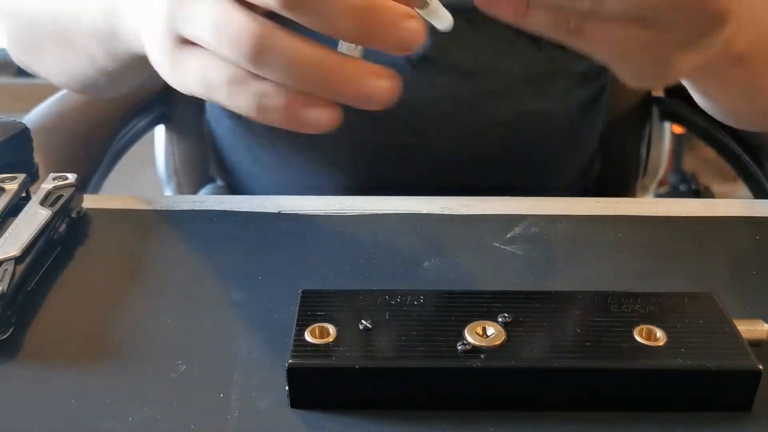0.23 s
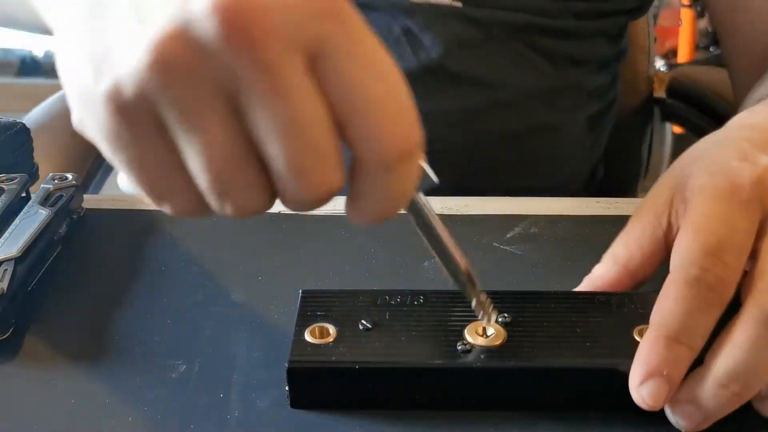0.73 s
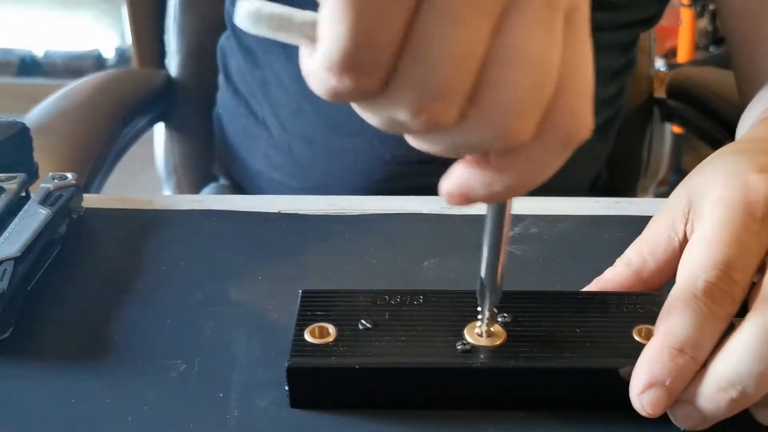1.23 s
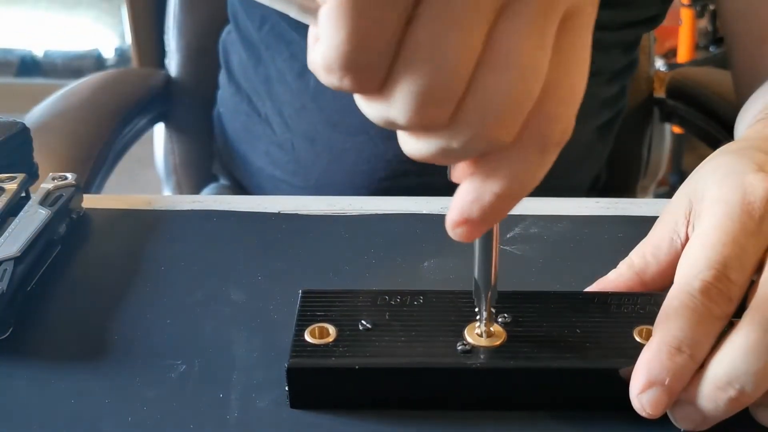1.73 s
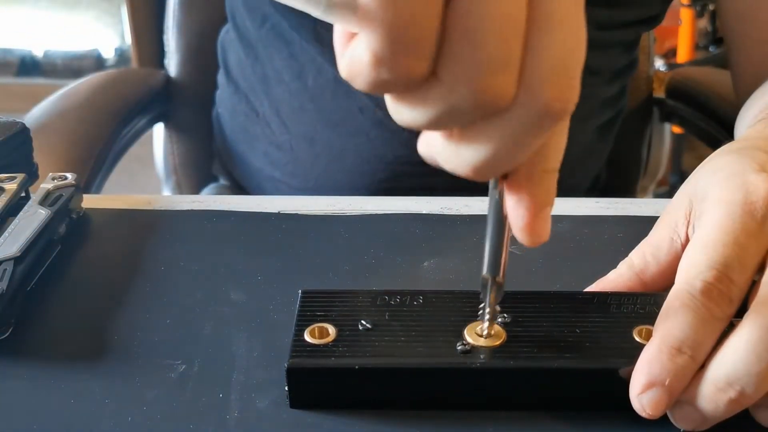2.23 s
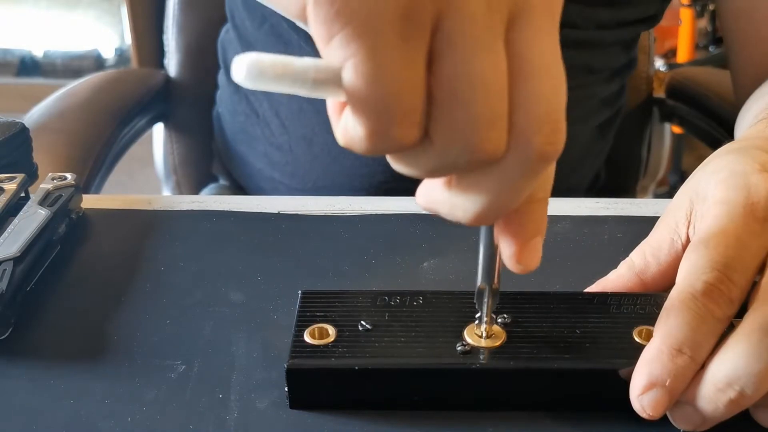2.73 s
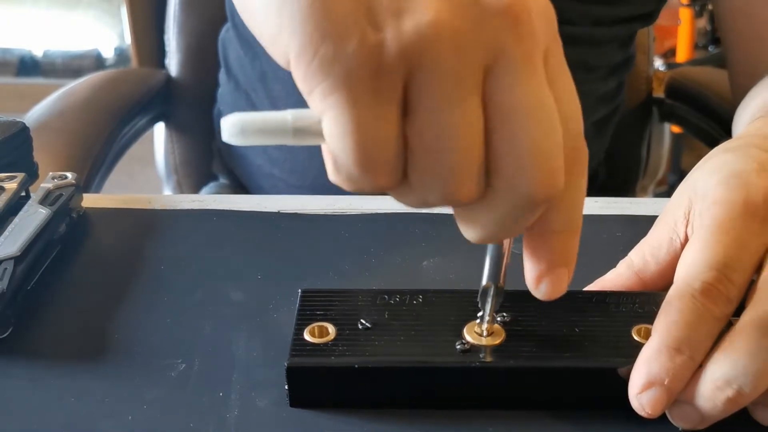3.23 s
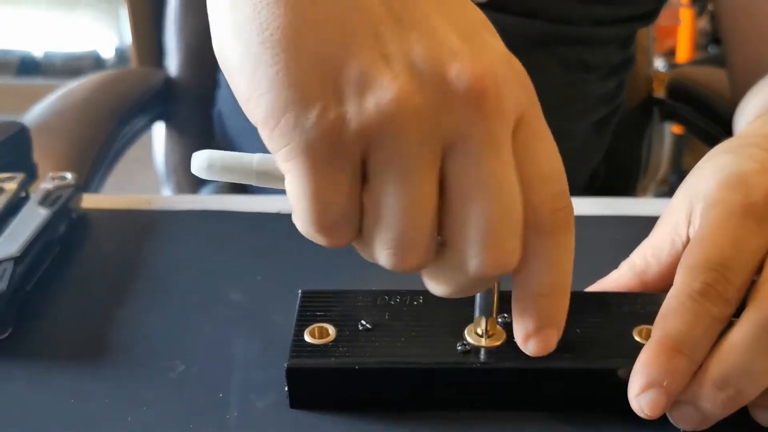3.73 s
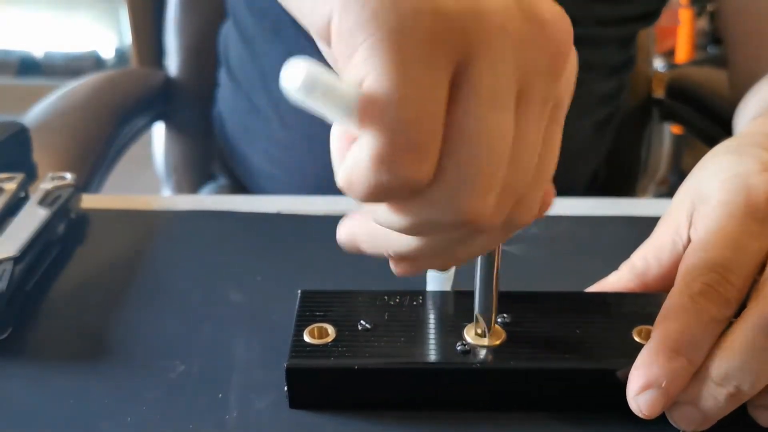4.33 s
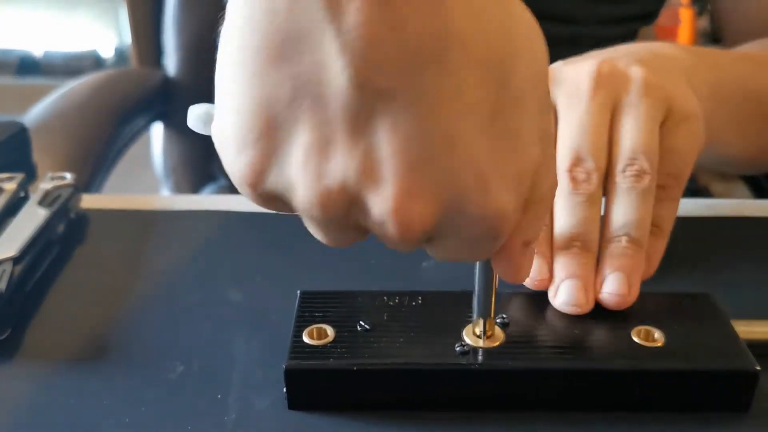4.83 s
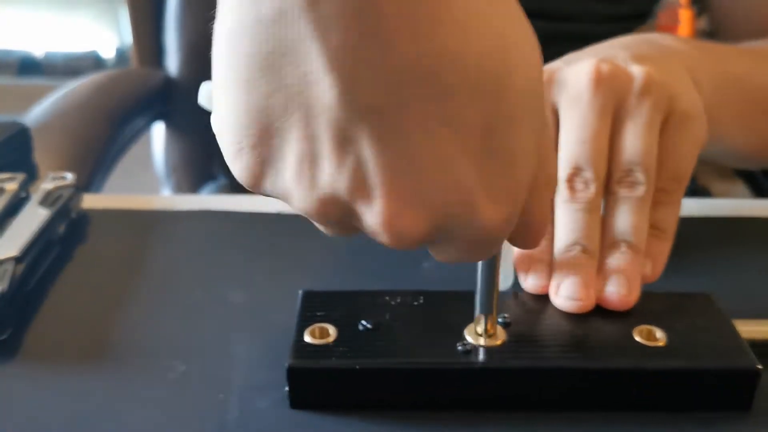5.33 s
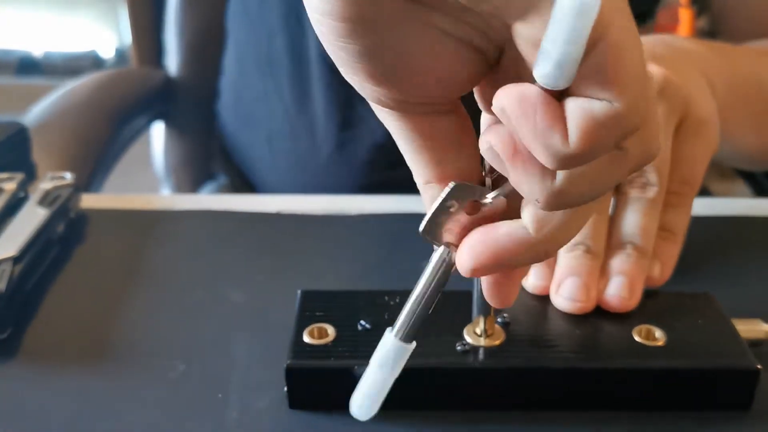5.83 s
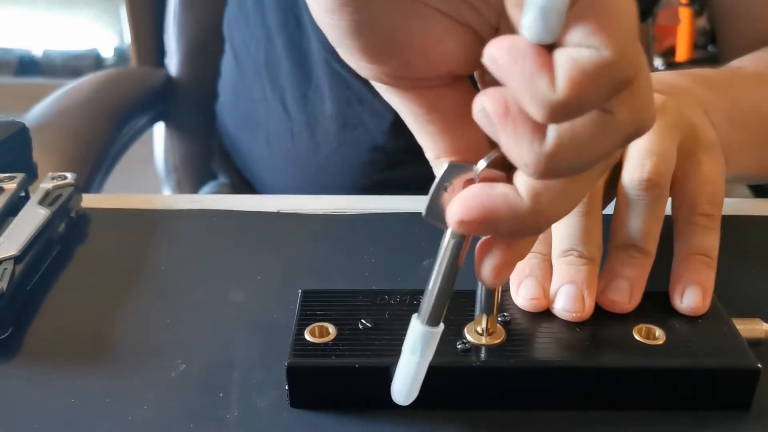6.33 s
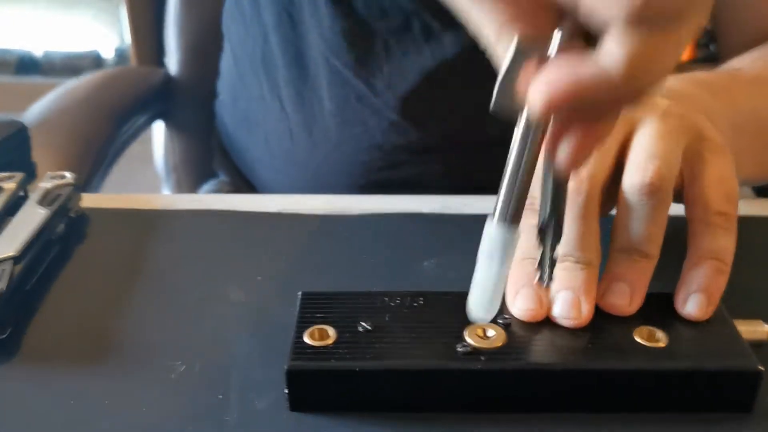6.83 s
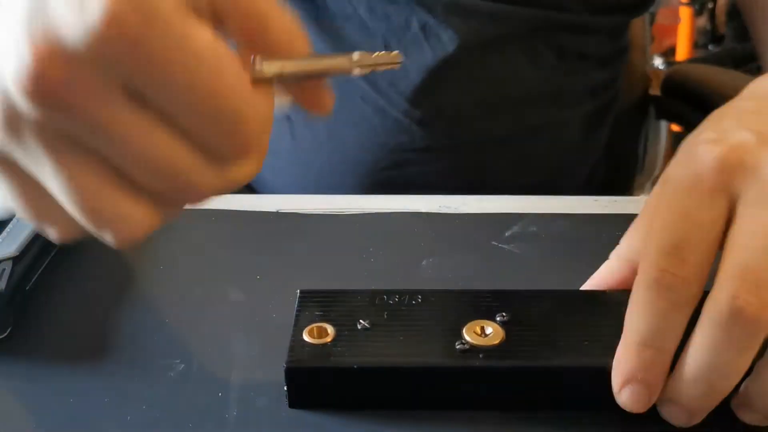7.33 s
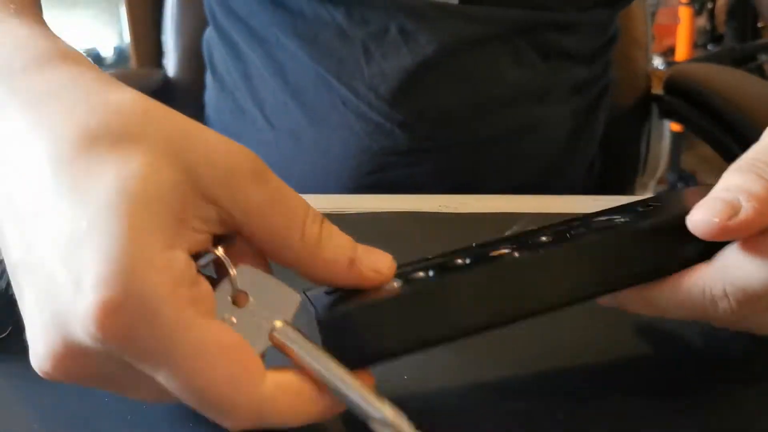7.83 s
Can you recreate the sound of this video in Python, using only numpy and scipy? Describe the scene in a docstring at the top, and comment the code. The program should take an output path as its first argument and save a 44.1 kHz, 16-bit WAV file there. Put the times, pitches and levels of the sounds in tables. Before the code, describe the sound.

Keys jangle, then one is fitted and turned in a steel bolt lock on a desk, with sharp clicks, scrapes and knocks.

```python
"""Keys jangle on their ring, close to a stereo microphone at a desk in a small, quiet room. One key is
fitted into a steel bolt lock lying on the desk, jiggled, pushed home, turned and pulled out; then the lock
is lifted and the keys tap it. Each contact in the lock clicks in the keys, knocks the hollow case and thumps
the desk top. Between the clicks metal scrapes on metal and hands jolt the desk, over faint room tone."""
import sys
import numpy as np
from scipy import signal
from scipy.fft import rfft, irfft, next_fast_len
from scipy.io import wavfile
from scipy.ndimage import uniform_filter1d

SR = 44100
rng = np.random.default_rng(int(sys.argv[2]) if len(sys.argv) > 2 else 0)


def unload_wav(signal):
    """Save mono or channel-first audio to the path in sys.argv[1] as 16-bit WAV at rate SR, clipped to [-1, 1]."""
    wavfile.write(
        sys.argv[1],
        SR,
        np.round(np.clip(np.atleast_2d(signal).T, -1, 1) * 32767).astype(np.int16),
    )


N = 355931

# room tone spectrum: (frequency [Hz], relative level [dB])
HUSH_SPECTRUM = [(12, -28.5), (20, 3), (171, -15.5), (318, -17), (472, -22), (559, -19), (1300, -25.5),
                 (2290, -24.5), (2870, -31.5), (15200, -35), (17000, -55.5)]
# room tone, a little louder at first: (time [s], level above 3.5 kHz [dB])
HUSH_LEVEL = [(0.0, -78.5), (0.212, -84.5), (1.2, -83)]
# room tone across the microphone: (frequency [Hz], left-right likeness [0-1])
HUSH_LIKENESS = [(60, 1), (380, 1), (2380, 0), (15000, 0)]
# decay of the room: (frequency [Hz], t60 [s])
ROOM_DECAY = [(200, 0.32), (1500, 0.27), (6000, 0.26), (14000, 0.12)]

# modes of the desk top, its legs, the lock case, its free side plate and the keys:
# (frequency [Hz], relative level [dB], nominal t60 [s])
DESK_MODES = [(99.4, -10, 0.37), (147.6, -1, 0.13), (187.5, -0.5, 0.13), (271.7, -3.5, 0.1),
              (304.8, -4, 0.12), (424, -17, 0.085)]
LEG_MODES = [(37, -8, 0.14), (54, -2.5, 0.46)]
CASE_MODES = [(480, -3.5, 0.048), (650, -3.5, 0.013), (803.6, 5, 0.05), (1141, -8, 0.058),
              (1300, -6.5, 0.24), (1864, -2, 0.044), (2249, 0.5, 0.033), (2930, -6, 0.032)]
PLATE_MODES = [(4100, -12, .1), (5575, -8, .17), (7512, 0, .17), (7535, -4, .17), (9620, -7, .12),
               (10550, -6, .1), (13500, -8, .1)]
KEY_MODES = [(3150, -4, .025), (4800, -7, .025), (6050, 0, .04), (7600, -9, .04), (9100, -4, .035),
             (9900, -3, .035), (10900, -4, .035), (12100, 0, .04), (12900, -2, .045), (15500, -15, .05)]

# a hand jolts the desk: (time [s], level [dB])
HAND_JOLTS = [(3.238, -44), (6.593, -35.5), (6.897, -21.5), (7.369, -36.5), (7.726, -50.5)]
# the desk rocks on its legs: (time [s], level [dB])
DESK_SWAYS = [(0.929, -58), (3.557, -36), (4.949, -53), (6.84, -35.5), (7.369, -54), (7.747, -62.5)]
# hands press on the desk: (time [s], level [dB])
HAND_PRESSURE = [(.7, -73), (.95, -67.5), (3.4, -67.5), (3.8, -60.5), (5.2, -64), (5.8, -88.5), (6.3, -76),
                 (7, -70), (7.6, -84)]
# rubbing strokes: (time [s], length [s], key level [dB], case level [dB], desk level [dB])
RUB_STROKES = [(0.969, 0.057, -69, -54.5, -52.5), (1.983, 0.066, -69, -54.5, -57.5),
               (2.324, 0.11, -88, -57.5, -64), (3.533, 0.1, -40, -43.5, -32.5),
               (3.641, 0.052, -49.5, -45, -34), (3.876, 0.22, -52.5, -59.5, -54.5),
               (4.009, 0.099, -57.5, -57, -56.5), (4.379, 0.28, -52.5, -45.5, -54),
               (4.531, 0.038, -36, -40, -52.5), (4.695, 0.18, -68.5, -68.5, -56),
               (4.853, 0.25, -65.5, -58.5, -67.5), (5.353, 0.68, -65, -56, -49.5),
               (5.558, 0.058, -48.5, -36.5, -49.5), (5.646, 0.057, -43.5, -43, -45.5),
               (5.782, 0.061, -38.5, -34, -46.5), (6.849, 0.11, -46.5, -44.5, -33),
               (7.192, 0.13, -60.5, -67.5, -68.5), (7.464, 0.17, -52.5, -74.5, -76),
               (8.034, 0.56, -46, -73, -99)]
# spectrum of a scraping key: (frequency [Hz], relative level [dB])
RASP_SPECTRUM = [(1470, -31.5), (2500, 0.5), (3360, 6), (4760, 10), (6010, -1), (8870, 3.5), (16000, 5)]
# keys hit keys, ring or pins: (time [s], level [dB], band centre [Hz])
KEY_JINGLES = [(0.067, -30.5, 11900), (0.074, -31.5, 6700), (0.135, -25, 9600), (0.138, -25, 9200),
               (0.1416, -31.5, 10300), (.151, -19, 9600), (.1584, -32, 13400), (0.1677, -33.5, 10400),
               (0.184, -18, 11300), (0.1973, -16.5, 11400), (0.2286, -33.5, 9700), (0.2805, -33.5, 8300),
               (0.398, -20.5, 11300), (0.401, -29.5, 5960), (0.4757, -42.5, 9000), (0.493, -47.5, 12800),
               (0.5252, -39, 6200), (.617, -30.5, 8800), (1.4452, -38, 6050), (2.5752, -39, 11400),
               (3.5684, -18.5, 10300), (3.582, -32.5, 10900), (3.852, -48.5, 8900), (3.888, -41, 6000),
               (3.896, -52, 8000), (3.9174, -31.5, 5700), (3.93, -32, 9100), (3.941, -30.5, 5600),
               (3.961, -39, 6500), (4.0165, -22.5, 7100), (4.125, -26.5, 10000), (4.299, -43.5, 5050),
               (4.351, -32, 6700), (4.357, -35.5, 6550), (4.414, -36.5, 12000), (4.44, -30.5, 9500),
               (4.6279, -37.5, 10100), (4.9502, -38.5, 6770), (5.012, -35.5, 11600), (5.471, -40.5, 8700),
               (5.503, -47, 8000), (5.53, -41, 6100), (5.7788, -31.5, 8800), (5.796, -38.5, 10000),
               (6.852, -35, 11000), (6.879, -31.5, 10200), (6.913, -27, 10500), (7.195, -29.5, 7700),
               (7.224, -36, 8100), (7.289, -43, 8900), (7.3446, -34.5, 7800), (7.4745, -27, 7600),
               (7.479, -40, 8700), (7.573, -32.5, 5700), (7.591, -44.5, 5000)]
# the key strikes inside the lock:
# (time [s], key level [dB], key centre [Hz], case level [dB], case centre [Hz], desk level [dB])
LOCK_CONTACTS = [(0.904, -31, 4330, -27, 910, -41), (1.129, -77, 4020, -31.5, 710, -50.5),
                 (1.253, -78, 3970, -53, 780, -51.5), (1.391, -39, 6600, -25, 1840, -52.5),
                 (1.506, -32.5, 6460, -34, 1570, -46.5), (1.560, -73, 5000, -44.5, 824, -40),
                 (1.708, -48.5, 6560, -50.5, 2100, -78), (1.831, -58.5, 5050, -40, 2200, -62),
                 (2.011, -40, 10300, -39.5, 2250, -68), (2.091, -37.5, 3800, -30.5, 875, -50),
                 (2.276, -81, 4000, -41, 820, -74), (2.350, -26, 11000, -22.5, 1730, -43.5),
                 (2.388, -42, 10300, -30, 865, -40), (2.494, -62, 5200, -44.5, 825, -60),
                 (2.554, -44, 8700, -33, 920, -46), (2.666, -50, 9800, -49.5, 810, -57),
                 (2.713, -54, 6000, -36, 970, -39.5), (2.992, -66, 4000, -53, 776, -37.5),
                 (3.118, -76, 4100, -46, 733, -35), (3.184, -52, 9700, -42, 2600, -70),
                 (3.539, -29, 11200, -18.5, 764, -25.5), (3.553, -38, 13200, -25.5, 2200, -46.5),
                 (3.658, -19, 4270, -16, 1690, -31), (3.996, -38, 10700, -25, 660, -35),
                 (4.156, -33.5, 6750, -24.5, 1870, -48), (4.286, -35.5, 6130, -32, 2030, -52.5),
                 (4.413, -41, 6100, -44, 2120, -44), (4.429, -33, 9300, -24, 1755, -44),
                 (4.450, -33, 6540, -23.5, 840, -44), (4.474, -38, 7000, -25.5, 2130, -36),
                 (4.519, -35, 12780, -21.5, 841, -42), (4.5359, -22, 5090, -15.5, 2040, -32),
                 (4.546, -38, 5000, -24, 2110, -51.5), (4.722, -42, 5830, -32.5, 584, -35.5),
                 (4.769, -71, 5000, -37.5, 585, -63), (4.834, -72, 5000, -44, 800, -71),
                 (4.871, -52, 9500, -44, 1900, -72), (4.914, -48, 6800, -35.5, 720, -50),
                 (4.93, -50, 6000, -39.5, 2090, -51), (5.104, -77, 5040, -48.5, 763, -54),
                 (5.286, -74, 5000, -39.5, 2180, -46.5), (5.351, -78, 5000, -50.5, 510, -42.5),
                 (5.409, -43, 11000, -47, 911, -40), (5.456, -45, 6560, -34, 798, -45.5),
                 (5.548, -41.5, 4750, -31, 754, -65), (5.566, -48, 5000, -26.5, 800, -74.5),
                 (5.577, -12, 9700, -15, 2130, -35), (5.652, -30, 11900, -31.5, 757, -64.5),
                 (5.67, -20.5, 12200, -24.5, 790, -47), (5.8015, -8.5, 11300, -26.5, 934, -41),
                 (5.944, -44, 6100, -31, 570, -43.5), (6.024, -46.5, 8200, -43, 1090, -47.5),
                 (6.080, -54, 4930, -53, 1011, -54), (6.129, -63, 9050, -52.5, 890, -61),
                 (6.157, -63, 5800, -48, 605, -47.5), (6.489, -69, 4000, -50, 1910, -44),
                 (6.501, -54.5, 3950, -38, 1190, -35.5), (6.617, -62.5, 4040, -40.5, 890, -36),
                 (6.805, -63, 3820, -31.5, 1390, -38.5), (6.831, -32.5, 10500, -26, 2100, -19.5)]
# keys tap the lifted case:
# (time [s], key level [dB], key centre [Hz], case level [dB], case centre [Hz], plate level [dB])
CASE_TAPS = [(7.645, -15.5, 11300, -13.5, 1730, -31), (7.701, -32.5, 6860, -30.5, 1300, -26.5),
             (7.907, -22, 8900, -17, 1440, -43), (8.007, -66, 6000, -37, 1690, -71),
             (8.026, -31.5, 8700, -26, 1250, -49)]
# the keys are gripped and damped: (start [s], end [s])
GRIPPED = (.85, 7.0)

LIFT_S = 7.6  # the case leaves the desk
PAN_DB, PAN_DB_PER_OCTAVE, PAN_SCATTER_DB = -3.5, -1.5, 4  # left minus right at 6 kHz; bright leans right
GRAZE_LEAD_S, GRAZE_DB, REBOUND_LAG_S, REBOUND_DB = .0025, -23, .008, -14  # typical, relative to the blow


def amp(db):
    """Decibels to amplitude."""
    return 10 ** (np.asarray(db) / 20)


def unit(x):
    """Scale to an RMS of one."""
    return x / np.sqrt(np.mean(x ** 2) + 1e-20)


def along(points, hz):
    """Interpolate (frequency, value) points on a log axis."""
    f, v = np.transpose(points)
    return np.interp(np.log(hz + 1), np.log(f + 1), v)


def level_curve(points):
    """One amplitude per sample from (time [s], level [dB]) points."""
    return amp(np.interp(np.arange(N) / SR, *np.transpose(points)))


def add(track, s, sound):
    """Lay a sound on the track at time s."""
    part = track[:, round(s * SR):][:, :sound.shape[1]]
    part += sound[:, :part.shape[1]]


def filtered(x, response):
    """Pass x through a complex frequency response."""
    n = x.shape[-1]
    size = next_fast_len(n + 2048)
    return irfft(rfft(x, size) * response(np.fft.rfftfreq(size, 1 / SR)), size)[..., :n]


def band(centre_hz, q):
    """One broad resonance."""
    return lambda f: 1j * f * centre_hz / q / (centre_hz ** 2 - f * f + 1j * f * centre_hz / q)


def thin(low_hz):
    """Small parts radiate no bass."""
    return lambda f: (-f * f / (low_hz ** 2 - f * f + 1j * np.sqrt(2) * f * low_hz)) ** 2


def resonant(modes, broaden):
    """Response of modes of alternating sign; faster decay makes a wider peak."""
    width = lambda t60: broaden * np.log(1000) / np.pi / t60
    return lambda f: sum((-1) ** k * amp(db) * band(hz, q=hz / width(t60))(f)
                         for k, (hz, db, t60) in enumerate(modes))


def scattered(modes, spread_db, detune=.015):
    """Each blow lands elsewhere, changing the modes' strengths; grip and seat shift their pitch."""
    return [(hz * (1 + detune * rng.normal()), db + rng.normal(0, spread_db), t60)
            for hz, db, t60 in modes]


def ring(modes, centre_hz, octaves, t60_scale, attack_s, phase_spread, scatter_db):
    """One blow: modes near centre_hz ring most, each at its own phase in each channel."""
    hz, db, t60 = np.transpose(modes)[:, :, None]
    t = np.arange(SR // 3) / SR
    strength, phase = rng.standard_normal((2, len(modes), 1))
    level = db + scatter_db * strength - 6 * (np.log2(hz / centre_hz) / octaves) ** 2
    fade = amp(level - 60 * t / (t60 * t60_scale)) * (1 - np.exp(-t / attack_s))
    pair = [np.sum(fade * np.sin(2 * np.pi * hz * t + side * phase_spread * phase), 0)
            for side in (1, -1)]
    return np.array(pair) / np.abs(np.mean(pair, 0)).max()


def left_right(mid, side, alike=0):
    """Two channels from mid and side; alike=1 is mono."""
    return np.array([mid + (1 - alike) * side, mid - (1 - alike) * side])


def puff(colour, t60, rise_s, alike):
    """Filtered stereo noise that swells and dies; its mid peaks at one."""
    t = np.arange(SR // 6) / SR
    mid, side = rng.standard_normal((2, len(t))) * amp(-60 * t / t60) * (1 - np.exp(-t / rise_s)) ** 2
    pair = filtered(left_right(mid, side, alike), colour)
    return pair / np.abs(pair.mean(0)).max()


def grit(colour, slips_per_s, spread_db, alike):
    """Small slips of random size over smooth friction noise, filtered, at unit RMS."""
    slips = (rng.random(N) < slips_per_s / SR) * amp(spread_db * np.minimum(rng.exponential(size=N), 3))
    lumps = uniform_filter1d(slips, size=90)
    mid, side = rng.standard_normal((2, N)) * (1 + unit(lumps))
    return unit(filtered(left_right(mid, side, alike), colour))


def chattering(blows):
    """No contact is clean: a faint graze leads each blow and a weaker rebound follows."""
    out = []
    for s, db, hz in blows:
        lead, graze, lag, rebound = .5 + rng.random(4)
        out += [(s - GRAZE_LEAD_S * lead, db + GRAZE_DB * graze, hz), (s, db, hz),
                (s + REBOUND_LAG_S * lag, db + REBOUND_DB * rebound, hz)]
    return out


def hush():
    """Room tone and microphone noise, centred in the bass and wide in the treble."""
    angle = lambda f: np.arccos(np.clip(along(HUSH_LIKENESS, f), -1, 1)) / 2
    colour = lambda f: amp(along(HUSH_SPECTRUM, f)) * [np.cos(angle(f)), np.sin(angle(f))]
    mid, side = filtered(rng.standard_normal((2, N)), colour)
    treble = filtered(mid, lambda f: f > 3500)
    return level_curve(HUSH_LEVEL) * left_right(mid, side) / treble.std()


def room(x, delay_s=.0028):
    """Near walls answer, the treble dying first; every quarter second meets a fresh tail."""
    out, step = np.zeros_like(x), SR // 4
    for start in range(0, N, step):
        hz, t, noise = signal.stft(rng.standard_normal((2, SR // 2)), SR, nperseg=256)
        tail = signal.istft(noise * amp(-60 * t / along(ROOM_DECAY, hz)[:, None]), SR, nperseg=256)[1]
        tail /= np.linalg.norm(tail[0])
        add(out, start / SR + delay_s, signal.fftconvolve(x[:, start:start + step], tail, axes=1))
    return out


def squeak(start_s=6.62, length_s=.18, start_hz=4300, fall_hz_per_s=4400):
    """A faint, unsteady falling squeak with a second tone an octave below."""
    progress = np.clip((np.arange(N) / SR - start_s) / length_s, 0, 1)
    hz = start_hz - fall_hz_per_s * progress * length_s
    waver_hz = 900 * uniform_filter1d(rng.standard_normal(N), size=150)
    phase = 2 * np.pi * np.cumsum(hz + waver_hz) / SR
    swell = np.sin(np.pi * progress ** .39) ** 2
    return amp(-77.5) * swell * (np.sin(phase) + .98 * np.sin(phase / 2))


def desk_thumps(boom_hz=175, scatter_octaves=.15):
    """Under the microphone, a little left, the desk top booms in its low modes and rocks on its legs."""
    out = np.zeros((2, N))
    for s, *_, db in LOCK_CONTACTS + HAND_JOLTS:
        hz = boom_hz * 2 ** (scatter_octaves * rng.normal())
        boom = ring(DESK_MODES, hz, octaves=.61, t60_scale=1, attack_s=.0036,
                    phase_spread=.25, scatter_db=3)
        add(out, s, amp(db) * boom)
    for s, db in DESK_SWAYS:
        sway = ring(LEG_MODES, 50, octaves=1.5, t60_scale=.92, attack_s=.019,
                    phase_spread=.18, scatter_db=3.5)
        add(out, s, amp(db) * sway)
    return out * amp([[1.4], [-1.4]])


def rubbing():
    """Keys scrape each other and the pins; case and desk take up the strokes, and leaning hands rumble."""
    strokes = np.zeros((3, N))
    for s, length, *levels in RUB_STROKES:
        progress = np.linspace(0, 1, round(length * SR))
        add(strokes, s, amp(levels)[:, None] * np.sin(np.pi * progress ** .65))
    on_keys, on_case, on_desk = strokes
    case_colour = lambda f: resonant(CASE_MODES, broaden=2.5)(f) * band(850, q=.6)(f)
    rasp = grit(lambda f: amp(along(RASP_SPECTRUM, f)), slips_per_s=220, spread_db=4, alike=.089)
    drone = grit(case_colour, slips_per_s=120, spread_db=7.5, alike=1)
    rumble = grit(resonant(DESK_MODES, broaden=3.4), slips_per_s=60, spread_db=2.5, alike=1)
    fade_in = np.clip(np.arange(N) / SR / HAND_PRESSURE[0][0], 0, 1) ** 4
    on_desk += level_curve(HAND_PRESSURE) * fade_in
    return (on_keys * rasp * amp([[-2.5], [2.5]]) + on_case * drone
            + on_desk * rumble * amp([[1.4], [-1.4]]))


def case_knocks(lag_s=.00071):
    """The hollow steel case answers just after each click; lifted, it loses bass and its plate rings."""
    out = np.zeros((2, N))
    for s, db, hz in chattering([(s, db, hz) for s, _, _, db, hz, _ in LOCK_CONTACTS + CASE_TAPS]):
        low_cut = thin(low_hz=1000 if s > LIFT_S else 300)
        modes = resonant(scattered(CASE_MODES, spread_db=3), broaden=1.8)
        body = puff(lambda f: band(hz, q=.85)(f) ** 2 * modes(f) * low_cut(f),
                    t60=.028, rise_s=.0004, alike=.92)
        slap = puff(lambda f: band(hz, q=.6)(f) ** 2 * low_cut(f), t60=.005, rise_s=.0005, alike=.3)
        add(out, s + lag_s, amp(db - 5.5) * (.8 * body + 1.3 * slap))
    for s, *_, db in CASE_TAPS:
        plate = ring(PLATE_MODES, 7000, octaves=3, t60_scale=.5, attack_s=.0004,
                     phase_spread=.6, scatter_db=1)
        add(out, s, amp(db) * plate)
    return out * amp([[-1.6], [1.6]])


def key_clicks():
    """Sharp, close clicks; the bunch shivers on in its blurred modes, longer when loose than gripped."""
    out, low_cut = np.zeros((2, N)), thin(low_hz=2500)
    for s, db, hz in chattering([row[:3] for row in KEY_JINGLES + LOCK_CONTACTS + CASE_TAPS]):
        shiver_s = .07 if GRIPPED[0] < s < GRIPPED[1] else .13
        pan_db = PAN_DB + PAN_DB_PER_OCTAVE * np.log2(hz / 6000) + PAN_SCATTER_DB * rng.normal()
        modes = resonant(scattered(KEY_MODES, spread_db=3.5), broaden=3)
        snap = puff(lambda f: band(hz, q=1.4)(f) ** 2 * (1 + 1.5 * modes(f)) * low_cut(f),
                    t60=.0045, rise_s=.0005, alike=.35)
        chime = puff(lambda f: band(hz, q=.6)(f) ** 2 * modes(f) * low_cut(f),
                     t60=shiver_s, rise_s=.0004, alike=.2)
        add(out, s, amp(db + np.array([[pan_db], [-pan_db]]) / 2) * (snap + amp(-15) * chime))
    return out


def scene():
    """At the desk: direct sound well above the room's answer, with room tone behind."""
    steel = key_clicks() + case_knocks() + squeak()
    handling = desk_thumps() + rubbing()
    return steel + handling + room(amp(-10) * steel + amp(-13) * handling) + hush()


def record(dry, top_hz=16900):
    """The microphone fades in the top octave and passes nothing above top_hz."""
    rolloff = [(14500, .5), (15800, -6.5), (16800, -33)]  # (frequency [Hz], gain [dB])
    return filtered(dry, lambda hz: amp(along(rolloff, hz)) * (hz < top_hz))


dry = scene()
out = record(dry)
unload_wav(out)
```